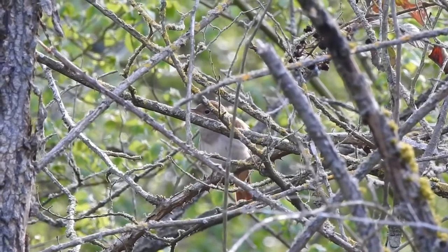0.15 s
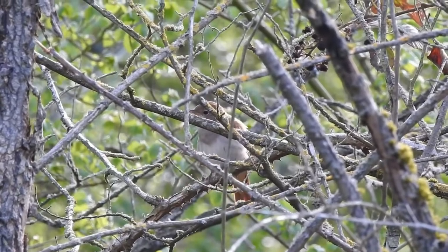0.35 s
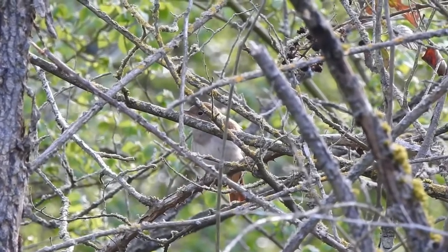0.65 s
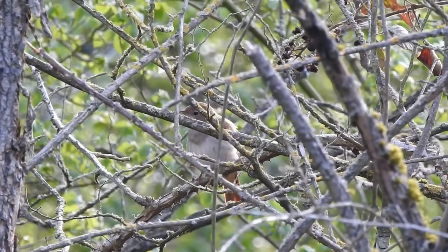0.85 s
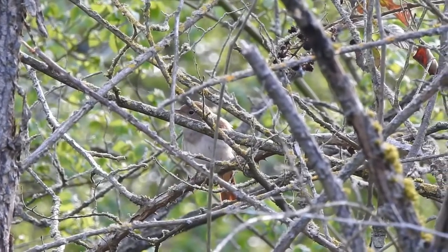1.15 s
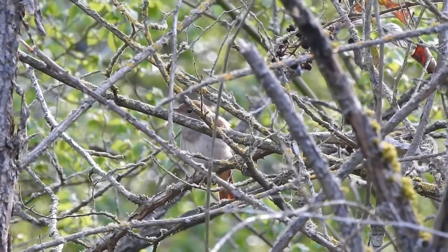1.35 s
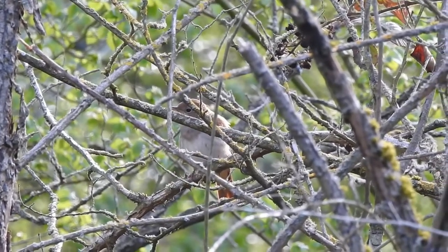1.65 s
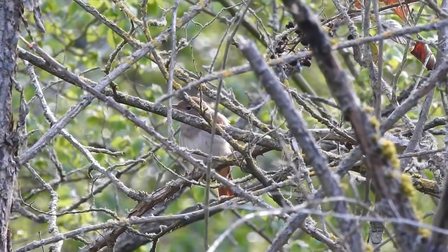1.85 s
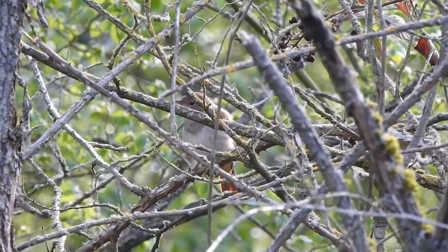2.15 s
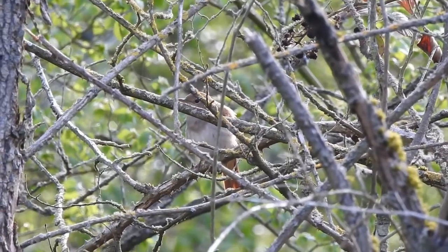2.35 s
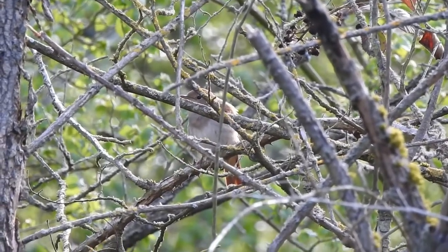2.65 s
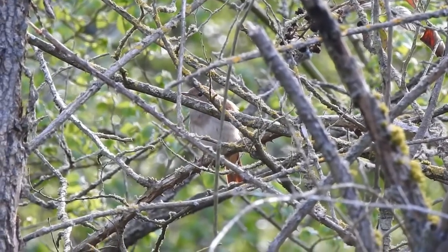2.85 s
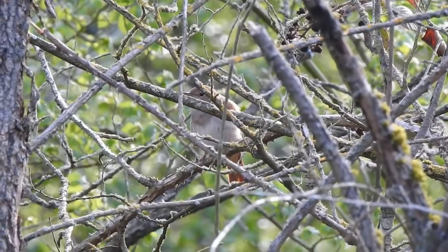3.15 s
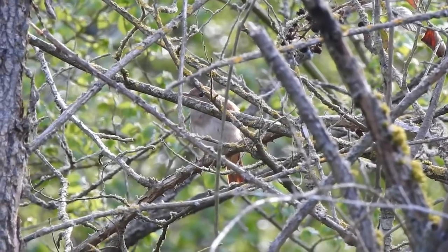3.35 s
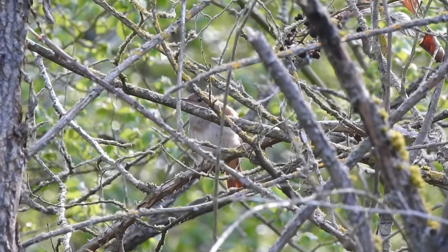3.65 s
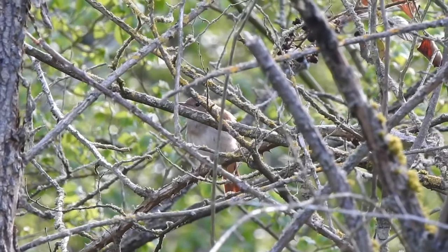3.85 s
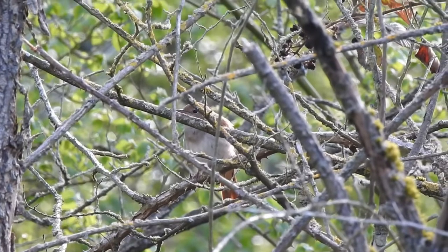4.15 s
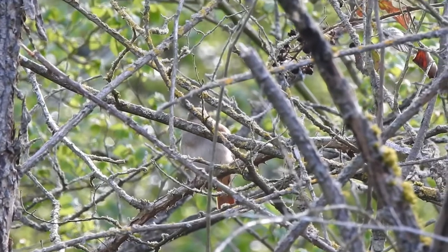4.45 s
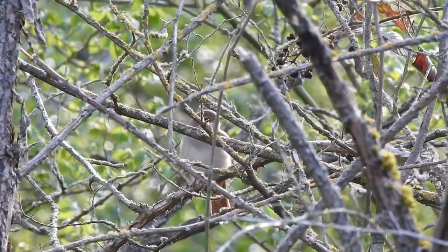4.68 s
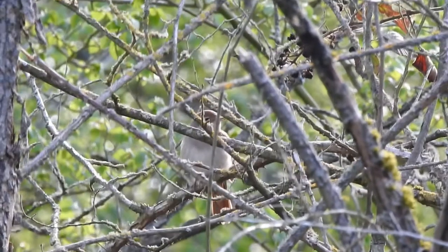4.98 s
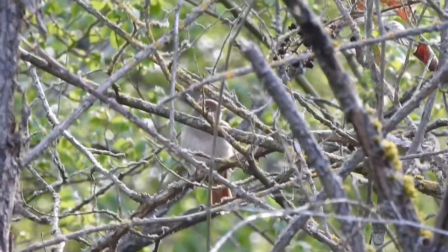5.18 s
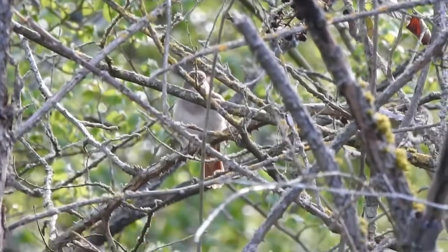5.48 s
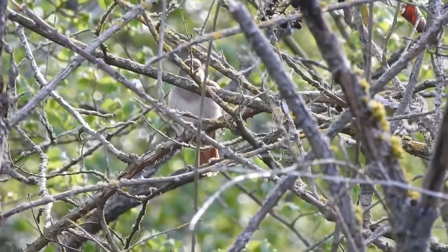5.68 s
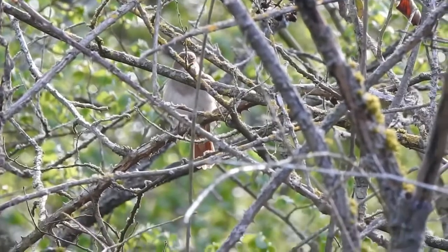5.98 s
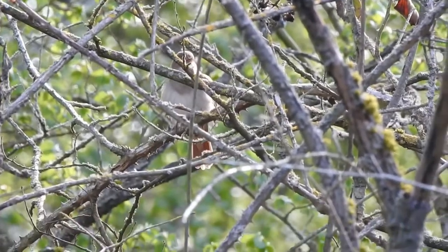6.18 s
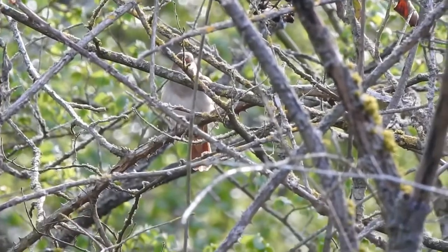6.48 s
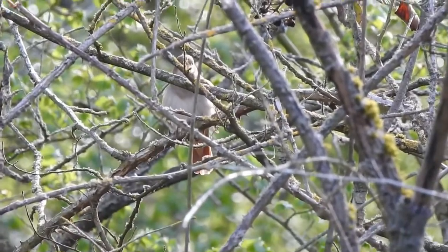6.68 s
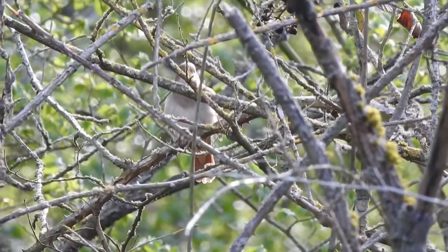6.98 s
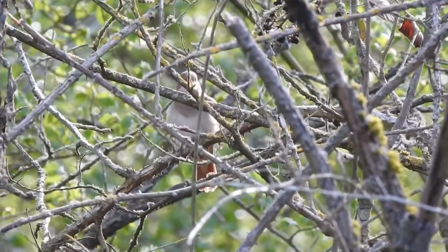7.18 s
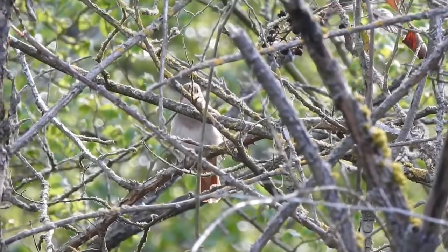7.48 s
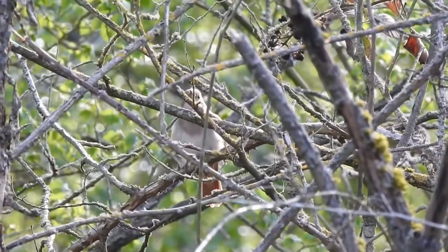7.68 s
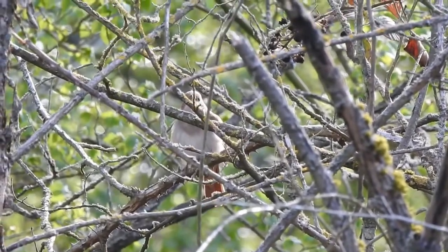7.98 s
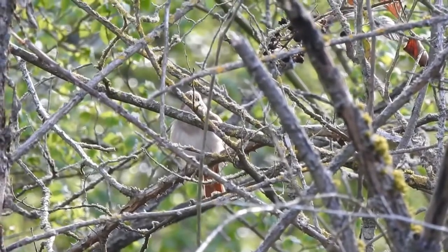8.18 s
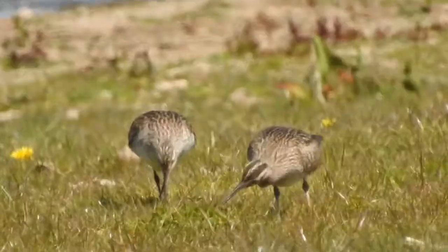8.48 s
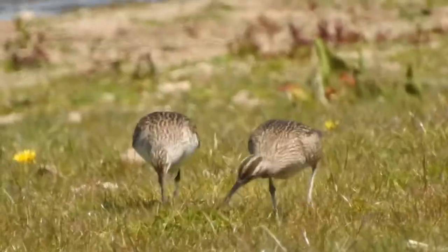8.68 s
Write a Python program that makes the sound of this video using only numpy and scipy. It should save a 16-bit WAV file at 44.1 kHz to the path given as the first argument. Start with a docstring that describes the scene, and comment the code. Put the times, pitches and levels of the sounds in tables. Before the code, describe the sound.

Outdoors in dense scrub, a soft low rush lies under scattered twitters, flutes, ticks and buzzes from small birds. A chiffchaff repeats hooked notes farther off. Then a nearby nightingale, slightly right, sings a swelling row of seven whistles, a fast rattling trill and two sharp chips. Echo fades softly among the twigs; a faint new whistle starts before an abrupt stop. Stereo pickup, singer close.

```python
"""Dense scrub with open air beyond: close to the microphones a nightingale swells through a row of arched
whistles, rattles a short trill, ends on two sharp chips and just begins another whistle.
Farther off a chiffchaff repeats its hooked notes and other songbirds flute, twitter, tick and buzz.
Every voice is a gliding tone; decaying stereo noise scatters it into a soft tail, like twigs and leaves.
Filtered noise makes the low outdoor rush below; then all sound cuts off."""
import sys
import numpy as np
from scipy import signal
from scipy.fft import rfft, irfft, next_fast_len
from scipy.io import wavfile
from scipy.ndimage import uniform_filter1d, map_coordinates

SR = 44100
rng = np.random.default_rng(int(sys.argv[2]) if len(sys.argv) > 2 else 0)


def unload_audio(sound):
    """Save the sound as a 16-bit wav file, at the path given as the first command line argument."""
    columns = np.transpose(np.atleast_2d(sound))
    # keep every value between -1 and 1, then stretch to whole-number steps
    steps = np.round(np.clip(columns, -1, 1) * 32767)
    wavfile.write(sys.argv[1], SR, steps.astype(np.int16))


N = 389403
END_S, CUTOFF_HZ = 8.398, 15650

# Note levels hold at the bird, before perch() sets each one's place.

# outdoor rush, spectrum before scaling: (frequency [Hz], density [dB per Hz])
RUSH = [(25, -16.5), (50, 2), (79, 9.5), (101, 2), (200, -0.6), (330, -5.5), (580, -3.5), (830, -6),
        (1750, -18.5), (5430, -22), (7700, -25.5), (10000, -31), (15500, -35.5)]
RUSH_DB = -45
# likeness of the rush at the two microphones: (frequency [Hz], likeness [0-1])
RUSH_LIKENESS = [(900, 0.9), (3000, 0.7), (10000, 0)]
# the rush lies to the right, its top hiss in the middle: (frequency [Hz], left minus right [dB])
RUSH_PAN = [(900, -4), (2400, -3), (13000, 0)]
# ringing of the scrub: (frequency [Hz], time to fall 60 dB [s])
SCRUB_T60 = [(3000, 1), (5000, 0.8), (9000, 0.6)]
THIN_LEAD_US = -62  # the high voices reach the right microphone first

# mellow, undulating notes: (time [s], length [s], middle pitch [Hz], level [dB])
WARBLES = [(0, 0.045, 2744, -33.5), (.1, 0.048, 2625, -35), (.16, .07, 2620, -42),
           (.238, 0.073, 2375, -43.5), (4.265, 0.12, 2800, -39), (4.375, 0.073, 2554, -38),
           (4.61, 0.13, 2425, -43), (4.745, 0.13, 2694, -36.5), (5.135, .11, 2594, -39.5),
           (5.27, 0.21, 2595, -42.5)]
# a mellow phrase that winds on without a break: (time [s], pitch [Hz], level [dB])
WINDING_PHRASE = [(3.64, 1950, -47), (3.675, 2520, -39), (3.695, 2050, -44), (3.72, 2420, -42),
                  (3.79, 2080, -46), (3.835, 2600, -36), (3.885, 2620, -36), (3.92, 2050, -48),
                  (3.98, 2680, -39), (4.045, 2400, -36), (4.09, 1950, -44), (4.105, 2520, -41),
                  (4.15, 2260, -41), (4.24, 2450, -48)]
UNDULATION, UNDULATION_HZ = .025, 12  # share of the pitch, typical swings a second

# bouts of far chatter: (from [s], to [s], lowest pitch [Hz], highest pitch [Hz], level [dB])
CHATTER = [(0, .3, 2700, 5000, -49.5), (3.65, 4.1, 3303, 6400, -48.5), (.4, 8.4, 2300, 6500, -67)]
CHIRPS_PER_S = 55

# six bends of a clear note: (first, last pitch as a factor of the middle one)
HOLD, SLUR, DROOP = (1.012, .99), (1.1, 1.0), (1.05, .8)
ARCH, RISE, FLICK = (.82, .94), (.86, 1.1), (1.22, .82)
# downward flicks: (time [s], level [dB])
FLICKS = [(.056, -32), (.084, -35), (.156, -37), (.191, -38), (4.722, -34), (4.762, -35)]
FLICK_S, FLICK_HZ = .008, 2950
# the other clear notes, one table a bend: (time [s], length [s], middle pitch [Hz], level [dB])
HOLDS = [(.507, .075, 4030, -36), (.64, .16, 3130, -50), (4.425, .056, 4000, -38),
         (4.88, 0.07, 2972, -34.5), (5.415, 0.059, 3356, -35.5), (6.31, 0.047, 4960, -34.5),
         (6.675, .045, 4860, -32), (8.115, .11, 4960, -44), (8.325, .05, 4336, -37)]
ARCHES = [(.308, 0.1, 3150, -39), (2.4, 0.047, 4390, -40), (3.325, .1, 2650, -54),
          (3.838, 0.0177, 4910, -31), (4.503, 0.036, 3484, -35.5)]
SLURS = [(.58, 0.058, 2930, -41.5), (1.995, 0.063, 2490, -49), (2.005, 0.072, 4826, -35.5),
         (2.315, .045, 5460, -35.5), (2.485, 0.052, 7650, -45.5), (4.672, 0.051, 3470, -30.5),
         (5.02, 0.014, 5330, -27.5), (5.062, 0.073, 3777, -35.5), (5.25, 0.065, 3003, -33.5),
         (5.485, 0.055, 3466, -32.5)]
RISES = [(2.285, 0.037, 6270, -30.5), (3.42, .085, 3550, -51), (4.632, 0.045, 3400, -33.5),
         (5.605, .11, 2756, -37), (5.912, 0.04, 2500, -41)]
DROOPS = [(3.585, 0.026, 2754, -36), (4.474, 0.017, 3650, -33), (5.034, .012, 5670, -31.5),
          (5.84, 0.057, 2445, -42.5)]
# clear notes above this sound thin, the rest mellow, among them soft rises into two whistles
THIN_ABOVE_HZ = 3730

# fluttering buzzes: (time [s], length [s], middle pitch [Hz], level [dB], share of the pitch lost)
BUZZES = [(0.16, 0.056, 5500, -43, 0.27), (.455, .03, 4300, -42, .5), (2.49, 0.065, 4610, -43.5, 0.14),
          (4.762, .022, 4250, -39, .1), (4.842, 0.025, 5890, -30, 0.022), (5.224, 0.033, 4230, -35, 0.25),
          (5.745, 0.055, 6500, -35.5, 0.14), (5.818, .018, 4600, -38, .2), (7.318, 0.041, 6550, -44, .03),
          (7.355, .028, 4900, -38, 0.28), (7.458, .045, 4360, -41.5, -0.047)]
# a run of short, evenly spaced buzzes that grow louder
STUTTER_START_S, STUTTER_BEAT_S, STUTTER_NOTE_S = 6.08, .0525, .022
STUTTER_HZ, STUTTER_SINK = 6630, .1
STUTTER_FIRST_DB, STUTTER_LAST_DB = -37.5, -29.5

# ticks: (time [s], pitch factor, level [dB])
TICKS = [(.302, 1.0, -35), (1.765, 1.0, -32.5), (3.676, .95, -33.5)]
# strokes of a tick, a thin high lead-in, its plunge and a hook below: (time into the call [s],
# length [s], first pitch [Hz], middle pitch [Hz], last pitch [Hz], relative level [dB])
TICK_STROKES = [(0, .024, 7350, 7200, 6900, -6.5), (.017, .021, 7100, 5900, 3500, 2),
                (.009, .02, 3500, 5400, 4600, 0)]

# churrs: (time [s], pitch factor, level [dB])
CHURRS = [(0.424, 1.064, -41), (2.311, 1.014, -42.5), (5.335, 1.0, -46)]
# course of one churr: (time [s], fundamental [Hz], relative level [dB])
CHURR_SHAPE = [(0, 1419, -4.5), (.025, 1217, 5), (.045, 1050, -1.5), (.065, 963, -8.5)]

# chiffchaff notes: (time [s], pitch of the shelf [Hz], level [dB])
CHIFFCHAFF = [(2.148, 4420, -47.5), (2.633, 4230, -44.5), (2.943, 5110, -42.5), (3.255, 4255, -41),
              (3.555, 5150, -39), (3.87, 4215, -40.5), (4.175, 5130, -37.5), (4.499, 5154, -40.5),
              (4.824, 4240, -40.5)]

# runs of a tiny bird's very high peeps: (from [s], to [s])
PEEP_RUNS = [(3.12, 3.34), (4.27, 4.4), (5.3, 5.75)]
PEEP_BEAT_S, PEEP_S, PEEP_HZ, PEEP_DB = .108, 0.034, 7950, -54
# bend of a peep: (first, last pitch as a factor of the middle one)
PEEP_BEND = (0.92, 0.82)

# thin falling lisps: (time [s], pitch factor, level [dB])
LISPS = [(3.62, 0.96, -38.5), (3.832, 0.94, -36.5), (4.77, 0.97, -37.5), (5.01, 0.95, -36),
         (5.925, 0.98, -39), (6.19, 0.88, -40)]
# course of one lisp: (time [s], pitch [Hz], relative level [dB])
LISP_SHAPE = [(0, 7320, -6.5), (.035, 6507, 0.5), (.09, 5750, -5.5), (.16, 4970, -6.5)]

# upsweeps: (time [s], pitch factor, level [dB])
UPSWEEPS = [(4.24, 1.025, -32.5), (5.968, 1.003, -29), (6.506, 1.02, -29.5), (8.355, 0.96, -42)]
# course of one upsweep: (time [s], pitch [Hz], relative level [dB])
UPSWEEP_SHAPE = [(0, 3784, -6.5), (.008, 5230, -2.5), (.016, 6260, 3), (.027, 6550, 5), (.042, 7190, -11.5)]

# the nightingale's row of whistles: (time of the pitch crest [s], pitch factor)
WHISTLES = [(5.467, 1), (5.742, 1.03), (6.012, 1.01), (6.279, 1.04), (6.527, 1.02), (6.789, 1.012),
            (7.044, 1.0)]
# course of one whistle: (time from the pitch crest [s], pitch [Hz], relative level [dB])
WHISTLE_SHAPE = [(-.09, 2880, -36.5), (-.053, 2983, -11.5), (-.02, 3211, -7.5), (0, 3370, -0.5),
                 (.02, 3022, -4), (.04, 2780, 1.5), (.055, 2668, -2.5), (.064, 2707, -21.5)]
FIRST_WHISTLE_DB, LAST_WHISTLE_DB = -31.5, -17
# a new row just begins: (time of the pitch crest [s], pitch factor, level [dB])
NEXT_WHISTLE = (8.357, 0.88, -35.5)
# trill notes on a strict beat: (pitch factor, level [dB])
TRILL = [(1.07, -26), (1.01, -26.5), (0.96, -30.5), (1.0, -28), (1.0, -31.5), (0.97, -31.5)]
# course of one trill note: (time [s], pitch [Hz], relative level [dB])
TRILL_SHAPE = [(0, 1400, -19), (.005, 1900, -5), (.012, 2430, 5), (.023, 2660, 2), (.035, 2640, -16)]
TRILL_START_S, TRILL_BEAT_S = 7.177, .0631
# closing chips: (time [s], pitch factor, level [dB])
CHIPS = [(7.576, 1.0, -15.5), (7.679, 1.015, -17.5)]
# strokes of a chip from the two sides of the syrinx, a hook, a plunge, a low bowl and a rise:
# (time into the call [s], length [s], first pitch [Hz], middle pitch [Hz], last pitch [Hz],
# relative level [dB])
CHIP_STROKES = [(0, .013, 6450, 6100, 4700, 0), (.009, .013, 5200, 4350, 3900, -1.5),
                (.005, .027, 4100, 3500, 4000, -2.5), (.034, .021, 3800, 4500, 5250, -4.5)]


def from_db(db):
    """Decibels to amplitude gain."""
    return 10 ** (np.asarray(db) / 20)


def rms_one(x):
    """Scale to rms 1."""
    return x / np.sqrt(np.mean(x ** 2) + 1e-20)


def at_hz(points, hz):
    """Read a table on a log-frequency axis."""
    table_hz, values = np.array(points).T
    return np.interp(np.log(hz + 1e-9), np.log(table_hz), values)


def drift(rate, size):
    """Smooth random wander about 0, with rate new random points a second."""
    at = np.arange(size) * rate / SR
    points = rng.standard_normal(size // 20 + 8)
    return map_coordinates(points, [at], order=3, mode="mirror")


def add(track, s, note):
    """Mix a note into a track at time s."""
    at = max(round(s * SR), 0)
    track[at:at + len(note)] += note[:N - at]


def crescendo(first_db, last_db, count):
    """Levels in dB of notes whose amplitude grows in equal steps."""
    return 20 * np.log10(np.linspace(from_db(first_db), from_db(last_db), count))


def bent(notes, bend):
    """Give notes of one kind their first, middle and last pitch."""
    first, last = bend
    return [(s, length, first * hz, hz, last * hz, db) for s, length, hz, db in notes]


def stroked(calls, strokes):
    """Spell out each call as its quick, partly overlapping strokes."""
    notes = []
    for s, factor, db in calls:
        for lag, length, *hz, stroke_db in strokes:
            notes.append((s + lag, length, *(factor * np.array(hz)), db + stroke_db))
    return notes


def syrinx(hz, level_db, waver=0.01, second_db=-46, third_db=-48, edge_s=0.00082, beak_hz=11500):
    """A tone of slightly unsteady pitch with soft ends; its two overtones fade above the beak's range."""
    n = len(hz)
    phase = 2 * np.pi * np.cumsum(hz * (1 + waver * drift(300.7, size=n))) / SR
    from_nearer_end = np.minimum(np.arange(n), np.arange(n)[::-1])
    ends = np.clip(from_nearer_end / (edge_s * SR), 0, 1)
    tone = np.sin(phase)
    for k, db in enumerate((second_db, third_db), 2):
        tone = tone + from_db(db) * np.sin(k * phase) / (1 + (k * hz / beak_hz) ** 8)
    return np.sqrt(2) * from_db(level_db) * np.sin(ends * np.pi / 2) ** 2 * tone


def repeated(shape, notes, **voice):
    """One note shape sung again and again, each time at its own pitch and strength."""
    s, hz, db = np.transpose(shape)
    t, out = np.arange(s[0], s[-1], 1 / SR), np.zeros(N)
    pitch = uniform_filter1d(np.interp(t, s, hz), size=len(t) // 14, mode="nearest")
    for start, factor, level_db in notes:
        add(out, start + s[0], syrinx(factor * pitch, level_db + np.interp(t, s, db), **voice))
    return out


def glides(notes, flutter=0, flutter_hz=100, taper_db=8, **voice):
    """Each note bends through three pitches and swells in the middle; a fast flutter makes it buzz."""
    out = np.zeros(N)
    for start, length, first, middle, last, level_db in notes:
        t = np.arange(0, length, 1 / SR)
        u = 2 * t / length - 1  # -1 to 1 along the note
        hz = middle + (last - first) / 2 * u + ((first + last) / 2 - middle) * u ** 2
        shake = flutter * np.sin(2 * np.pi * flutter_hz * rng.uniform(.85, 1.15) * t)
        add(out, start, syrinx(hz * (1 + shake), level_db - taper_db * u ** 2, **voice))
    return out


def scrub(near_db, near_s=0.022, alike=0.62):
    """Stereo echo of the thicket: a quick scatter from near twigs, then a long tail from the trees."""
    t, out = np.arange(SR) / SR, 0
    edges = np.geomspace(900, 14000, num=8)
    alike = np.clip(alike, 0, 1)
    for low, high in zip(edges, edges[1:]):
        band = signal.butter(2, [low, high], "band", fs=SR, output="sos")
        mid, side = signal.sosfilt(band, rng.standard_normal((2, SR)))
        tail = from_db(-60 * t / at_hz(SCRUB_T60, np.sqrt(low * high)))
        scatter = from_db(near_db) * np.exp(-t / near_s)
        both = np.sqrt(1 + alike) * mid + np.sqrt(1 - alike) * side * [[1], [-1]]
        out = out + (tail + scatter) * both
    out = out * (1 - np.exp(-(t / 0.002) ** 2))  # the echo sets in softly
    band_share = (edges[-1] - edges[0]) / (SR / 2)
    return rms_one(out) / np.sqrt(SR) * np.sqrt(band_share)


def perch(song, echo, wet_db, level_db=0, pan_db=0, lead_us=0):
    """Place a bird: its direct sound reaches the left microphone lead_us earlier; the thicket answers."""
    size = next_fast_len(N + SR)
    spectrum, hz = rfft(song, size), np.fft.rfftfreq(size, 1 / SR)
    sides = np.array([[1], [-1]]) / 2
    direct = np.exp(2j * np.pi * hz * sides * lead_us / 10 ** 6)
    paths = direct + from_db(wet_db) * rfft(echo, size)
    return from_db(level_db + pan_db * sides) * irfft(spectrum * paths, size)[:, :N]


def rush(lull_db_per_s=0.29, swell_db=2.0, swell_s=5, swell_width_s=1.5):
    """Noise as a distant rumble that swells once and air in the leaves that calms; wider in the treble."""
    size = next_fast_len(N)
    hz, t = np.fft.rfftfreq(size, 1 / SR), np.arange(N) / SR
    sides = np.array([[1], [-1]])
    mid, side = rfft(rng.standard_normal((2, size)))
    alike = np.clip(at_hz(RUSH_LIKENESS, hz), 0, 1)
    both = np.sqrt(1 + alike) * mid + np.sqrt(1 - alike) * side * sides
    colour = from_db(at_hz(RUSH, hz) + at_hz(RUSH_PAN, hz) * sides / 2)
    noise = rms_one(irfft(both * colour, size)[:, :N])
    rumble = signal.sosfiltfilt(signal.butter(2, 220, fs=SR, output="sos"), noise)
    leaves = (noise - rumble) * from_db(-lull_db_per_s * (t - t[-1] / 4))
    swell = from_db(swell_db * (np.exp(-((t - swell_s) / swell_width_s) ** 2) - .5))
    return (rumble * swell + leaves) * from_db(RUSH_DB)


def warbling():
    """Mellow low notes, their pitch undulating, and one unbroken winding phrase."""
    s, hz, db = np.transpose(WINDING_PHRASE)
    t = np.arange(s[0], s[-1], 1 / SR)
    pitch = uniform_filter1d(np.interp(t, s, hz), size=SR // 70, mode="nearest")
    out = glides(bent(WARBLES, HOLD), flutter=UNDULATION, flutter_hz=UNDULATION_HZ,
                 taper_db=4, edge_s=.005)
    add(out, s[0], syrinx(pitch, np.interp(t, s, db)))
    return out


def far_chatter(chirp_s=.018):
    """Faint chirps of random pitch, bend and length (one to three chirp_s) from birds far away."""
    notes = []
    for first, last, low_hz, high_hz, level_db in CHATTER:
        starts = np.arange(first, last, 1 / CHIRPS_PER_S)
        chances = rng.random((len(starts), 5))
        for s, (late, long, pitch, bend, hook) in zip(starts, chances):
            hz = low_hz * (high_hz / low_hz) ** pitch
            first_hz, last_hz = hz * (1 + (bend - .5) / 2), hz * (1 + (hook - .5) / 2)
            start = s + late / CHIRPS_PER_S / 2
            notes.append((start, chirp_s * (1 + 2 * long), first_hz, hz, last_hz, level_db))
    return glides(notes)


def clear_notes():
    """Clear gliding notes, split by middle pitch into mellow fluting and thin twitter."""
    flicks = [(s, FLICK_S, FLICK_HZ, db) for s, db in FLICKS]
    kinds = [(HOLDS, HOLD), (SLURS, SLUR), (DROOPS, DROOP), (ARCHES, ARCH), (RISES, RISE), (flicks, FLICK)]
    notes = np.array([note for kind, bend in kinds for note in bent(kind, bend)])
    thin = notes[:, 3] > THIN_ABOVE_HZ
    fluting = glides(notes[~thin], taper_db=3, edge_s=0.005)
    twitter = glides(notes[thin], taper_db=6, edge_s=0.003)
    return fluting, twitter


def buzzing():
    """Notes whose pitch flutters too fast to follow, single and in a stuttering run."""
    swell = crescendo(STUTTER_FIRST_DB, STUTTER_LAST_DB, count=4)
    stutter = [(STUTTER_START_S + k * STUTTER_BEAT_S, STUTTER_NOTE_S, STUTTER_HZ, db, STUTTER_SINK)
               for k, db in enumerate(swell)]
    notes = [(s, length, hz * (1 + sink / 2), hz, hz * (1 - sink / 2), db)
             for s, length, hz, db, sink in BUZZES + stutter]
    return glides(notes, flutter=0.04, flutter_hz=132.0, taper_db=1.0, waver=0.032)


def ticks():
    """Quick overlapping strokes: a high lead-in, a plunge and a hook below it."""
    return glides(stroked(TICKS, TICK_STROKES), taper_db=5.5, waver=0.018, edge_s=0.0031)


def churrs():
    """Low sinking notes whose two overtones outweigh the fundamental."""
    return repeated(CHURR_SHAPE, CHURRS, waver=0.026, second_db=8.0, third_db=1.5)


def chiffchaff(top_hz=7000, high_plunge_s=.018, low_plunge_s=.011, droop_per_s=15, droop_db_per_s=850):
    """Each note plunges from the top, faster if it has farther to go, rests on a shelf and droops away."""
    t, out = np.arange(0, .088, 1 / SR), np.zeros(N)
    late = np.maximum(t - .056, 0)  # time since the shelf ended
    for start, shelf_hz, level_db in CHIFFCHAFF:
        plunge_s = at_hz([(4250, low_plunge_s), (5150, high_plunge_s)], shelf_hz)
        plunge = np.exp(-(t / plunge_s) ** 2)
        hz = (shelf_hz + (top_hz - shelf_hz) * plunge) * np.exp(-droop_per_s * late)
        add(out, start, syrinx(hz, level_db - 3 * plunge ** 2 - droop_db_per_s * late - 60 * t))
    return out


def peeping():
    """Evenly paced runs of faint, high peeps whose pitch arches."""
    notes = [(s, PEEP_S, PEEP_HZ, PEEP_DB)
             for first, last in PEEP_RUNS for s in np.arange(first, last, PEEP_BEAT_S)]
    return glides(bent(notes, PEEP_BEND))


def lisps():
    """Thin high notes that sink steadily."""
    return repeated(LISP_SHAPE, LISPS)


def upsweeps():
    """Rising notes; under the top of each the other side of the syrinx adds a lower tone."""
    undertones = glides([(s + 0.018, .032, 5250, 4900, 5300, db - 8) for s, factor, db in UPSWEEPS])
    return repeated(UPSWEEP_SHAPE, UPSWEEPS, waver=0.018) + undertones


def around():
    """The fainter voices in the scrub, each group with its own level, side and share of echo."""
    fluting, twitter = clear_notes()
    sharp = upsweeps() + ticks() + buzzing()
    faint = lisps() + far_chatter() + peeping()
    echo, short_echo = scrub(near_db=7.5), scrub(near_db=15)
    high = dict(lead_us=THIN_LEAD_US)
    return (perch(fluting, echo, level_db=0.8, wet_db=-3.5)
            + perch(warbling(), echo, wet_db=-1.5)
            + perch(churrs(), echo, level_db=-6.5, wet_db=-2.0)
            + perch(twitter, short_echo, level_db=3.0, wet_db=-4.5, pan_db=-4.5, **high)
            + perch(sharp, echo, level_db=3.0, wet_db=-5.0, pan_db=-4.5, **high)
            + perch(faint, echo, level_db=-1.5, wet_db=3.5, pan_db=-2.5, **high)
            + perch(chiffchaff(), echo, level_db=4.0, wet_db=-3.0, pan_db=-3.5, **high))


def whistles():
    """Arched whistles that swell in equal steps of amplitude, then the start of a new row."""
    swell = crescendo(FIRST_WHISTLE_DB, LAST_WHISTLE_DB, count=len(WHISTLES))
    row = [(s, factor, db) for (s, factor), db in zip(WHISTLES, swell)]
    return repeated(WHISTLE_SHAPE, row + [NEXT_WHISTLE], waver=0.0028, second_db=-24.5)


def trill():
    """A rattle of short rising notes on a strict beat."""
    notes = [(TRILL_START_S + k * TRILL_BEAT_S, *note) for k, note in enumerate(TRILL)]
    return repeated(TRILL_SHAPE, notes)


def chips():
    """Sharp calls in which both sides of the syrinx sound overlapping strokes."""
    strokes = stroked(CHIPS, CHIP_STROKES)
    return glides(strokes, taper_db=6.0, waver=0.006, second_db=-36.0, edge_s=0.0026)


def nightingale():
    """The near singer, a little to the right, with a strong early scatter from the twigs."""
    echo = scrub(near_db=16.5)
    return perch(whistles() + trill() + chips(), echo, wet_db=-5, pan_db=-2.6)


def scene():
    """All the birds over the outdoor rush."""
    return rush() + around() + nightingale()


def record(dry):
    """The sound stops abruptly; a steep low-pass cuts the top."""
    running = np.clip((END_S - np.arange(N) / SR) / .004, 0, 1)
    low_pass = signal.ellip(10, .1, 90, CUTOFF_HZ, fs=SR, output="sos")
    return signal.sosfilt(low_pass, dry * running)


dry = scene()
out = record(dry)
unload_audio(out)
```